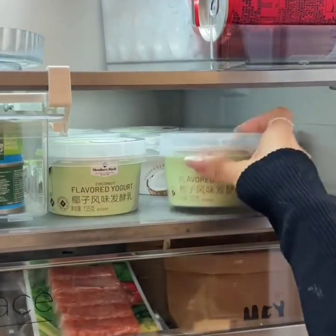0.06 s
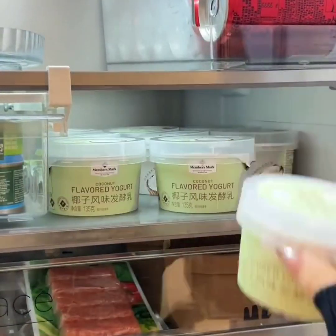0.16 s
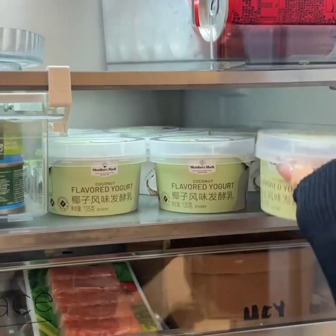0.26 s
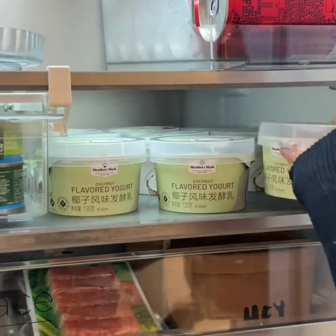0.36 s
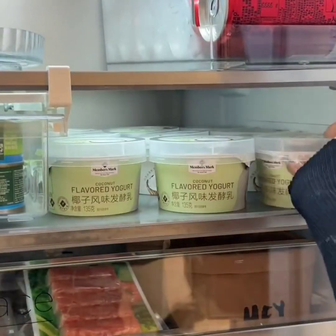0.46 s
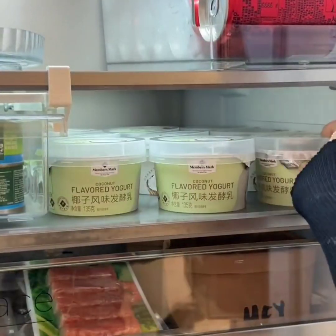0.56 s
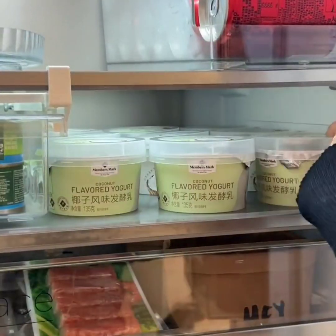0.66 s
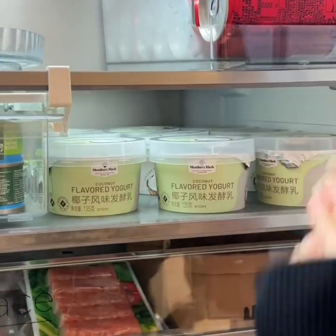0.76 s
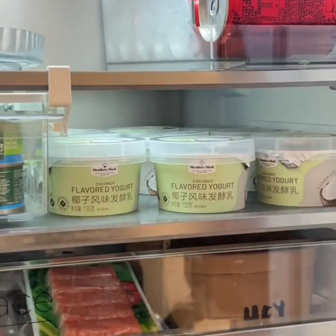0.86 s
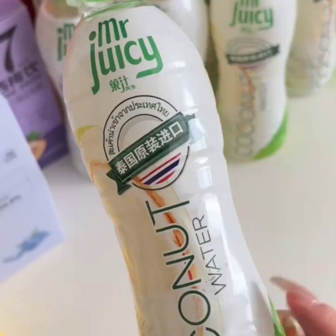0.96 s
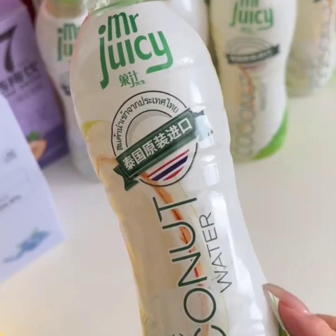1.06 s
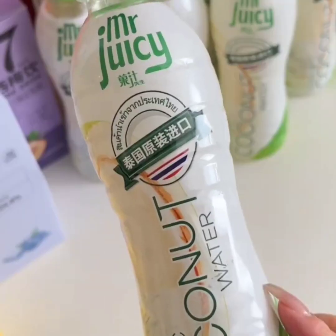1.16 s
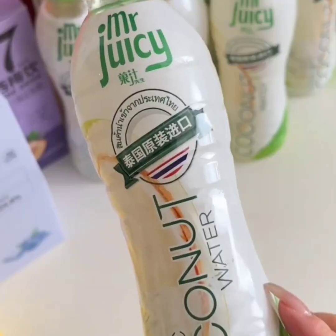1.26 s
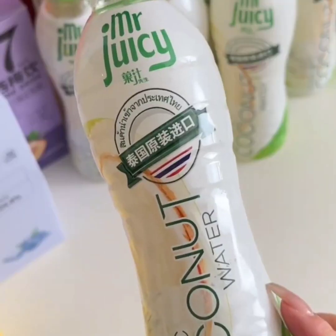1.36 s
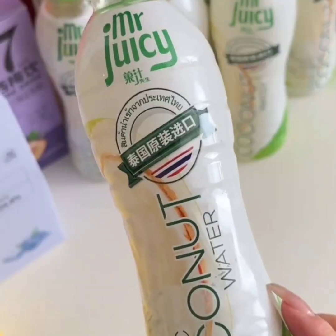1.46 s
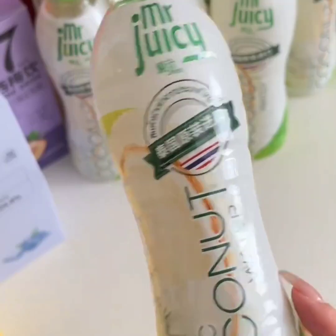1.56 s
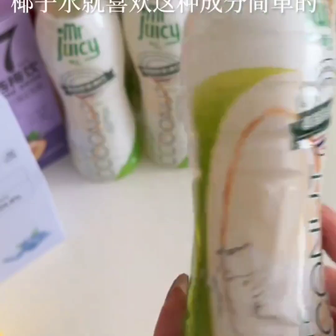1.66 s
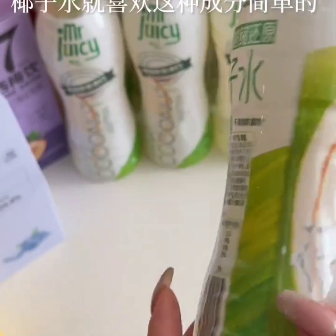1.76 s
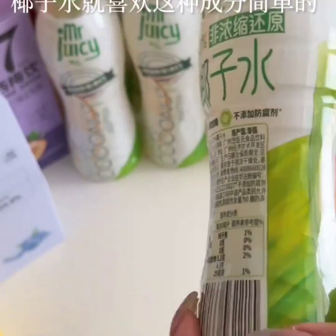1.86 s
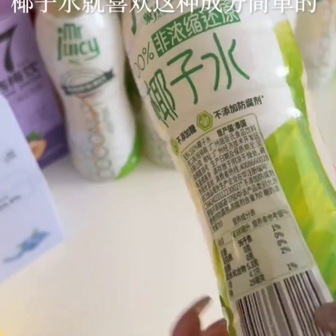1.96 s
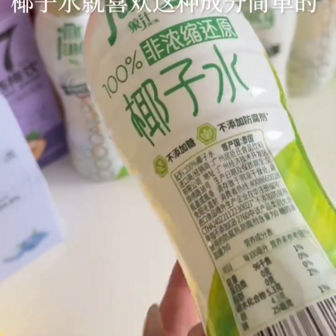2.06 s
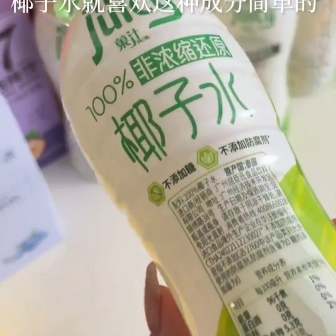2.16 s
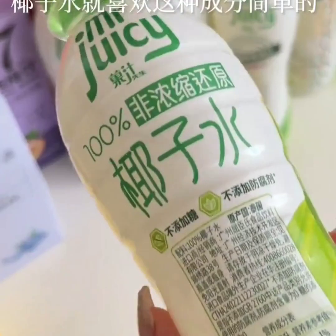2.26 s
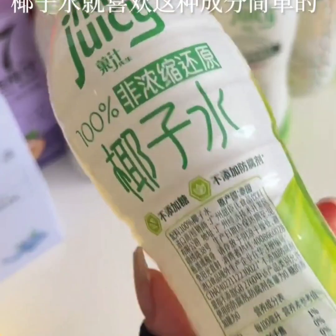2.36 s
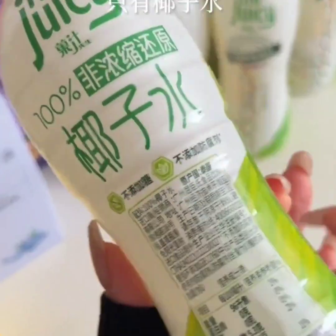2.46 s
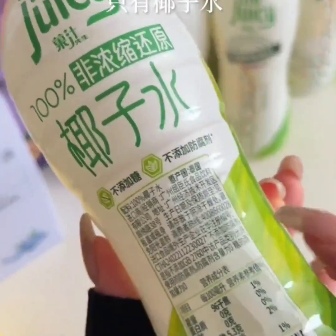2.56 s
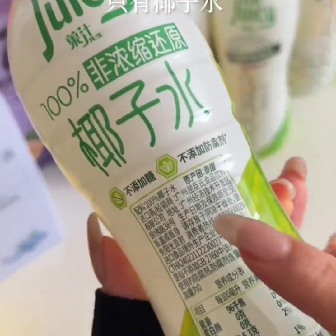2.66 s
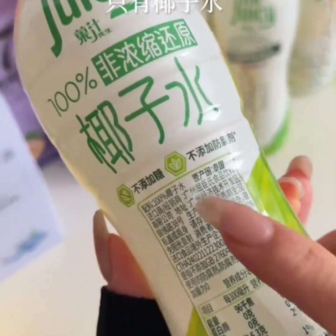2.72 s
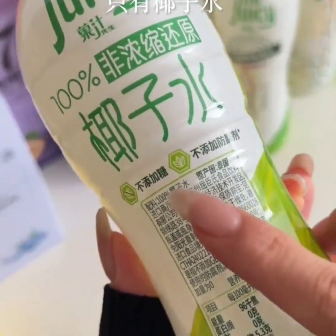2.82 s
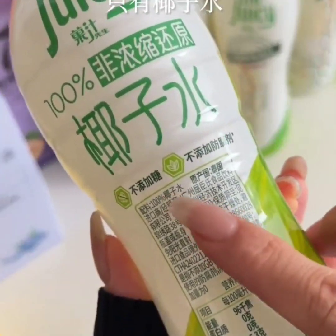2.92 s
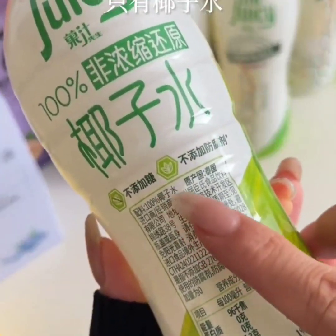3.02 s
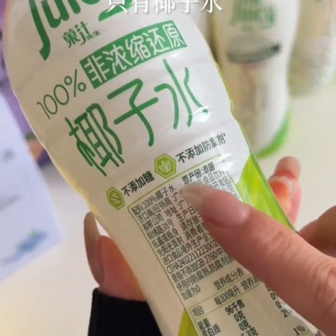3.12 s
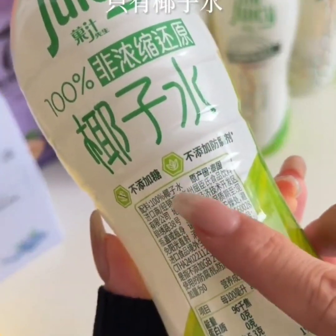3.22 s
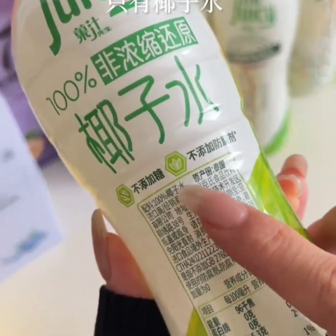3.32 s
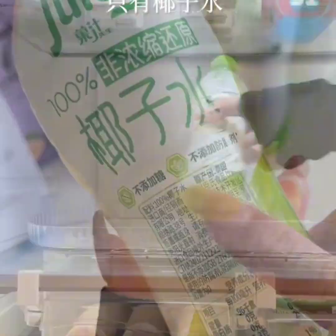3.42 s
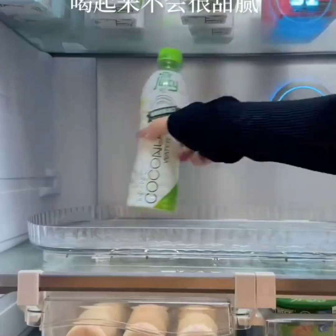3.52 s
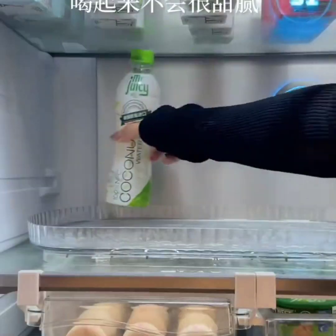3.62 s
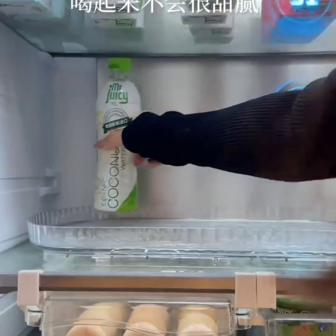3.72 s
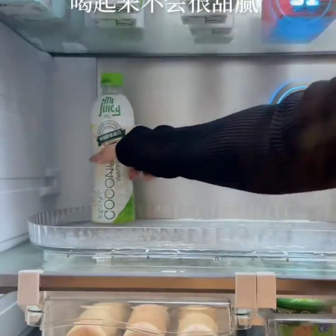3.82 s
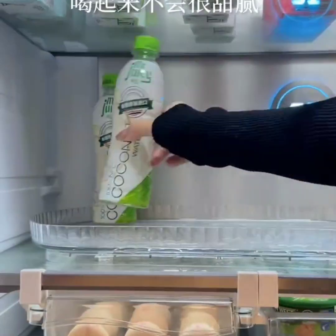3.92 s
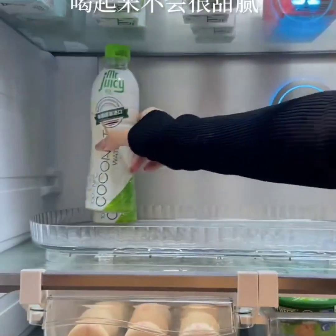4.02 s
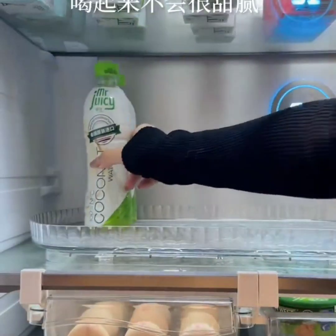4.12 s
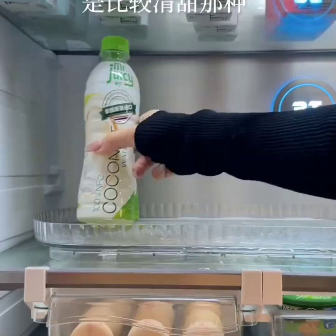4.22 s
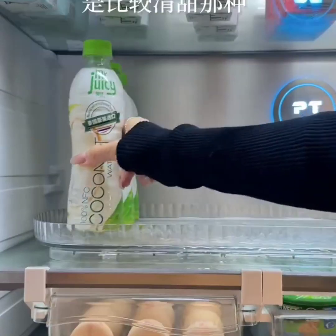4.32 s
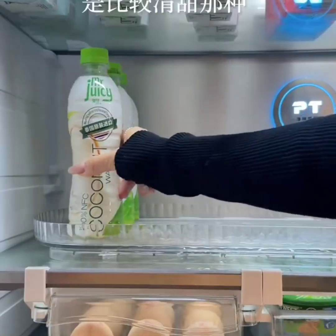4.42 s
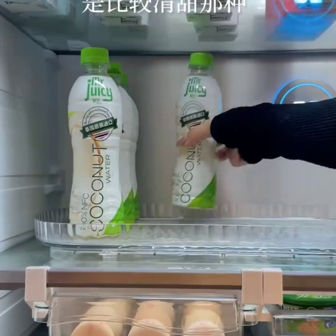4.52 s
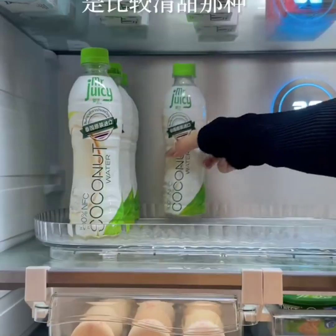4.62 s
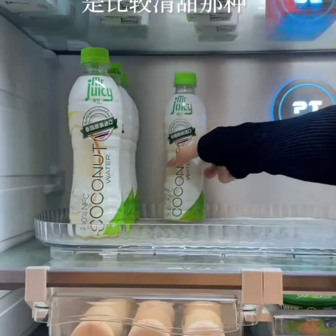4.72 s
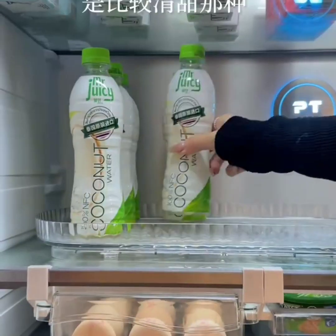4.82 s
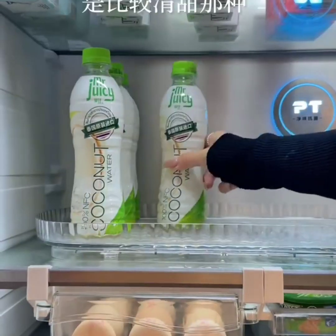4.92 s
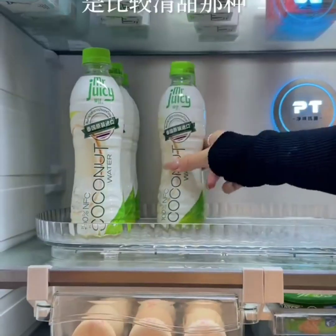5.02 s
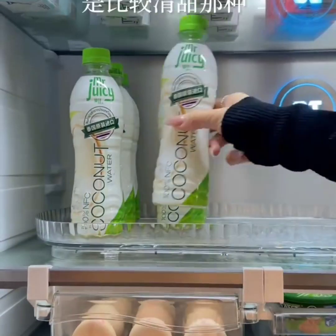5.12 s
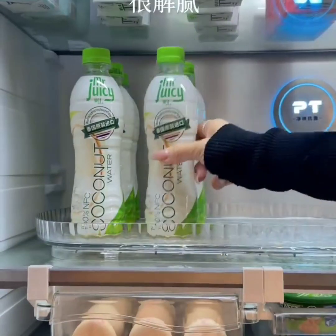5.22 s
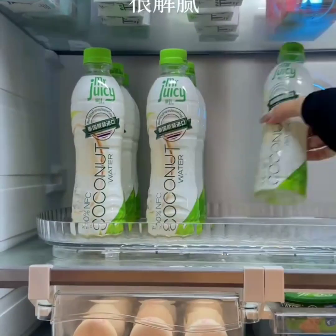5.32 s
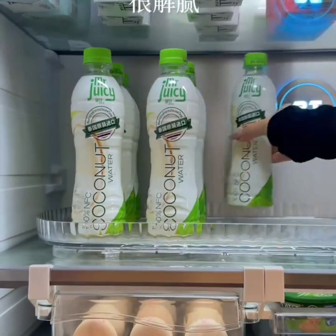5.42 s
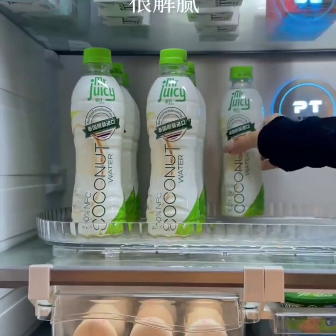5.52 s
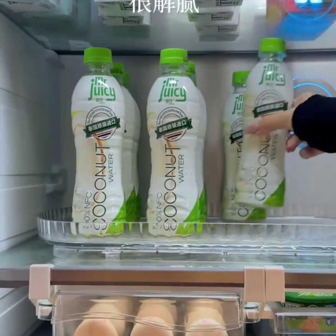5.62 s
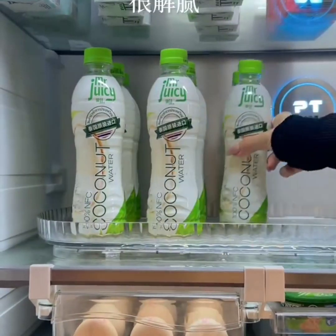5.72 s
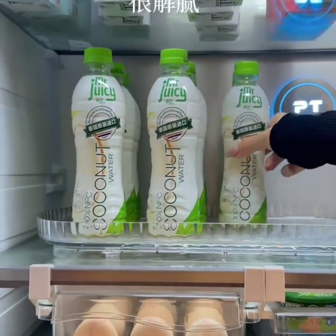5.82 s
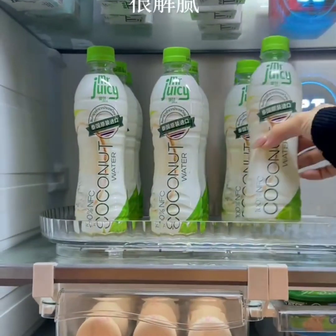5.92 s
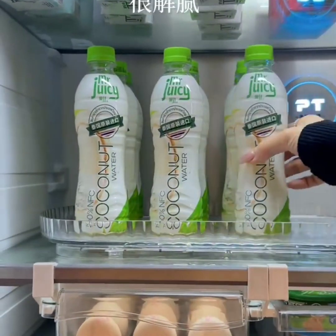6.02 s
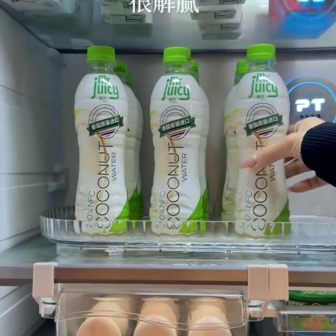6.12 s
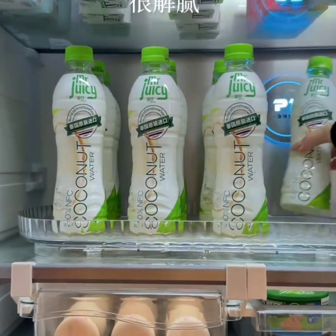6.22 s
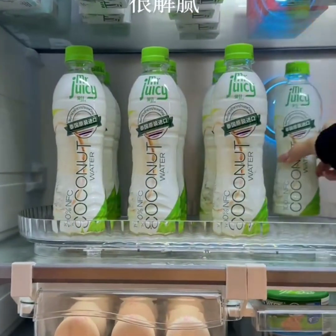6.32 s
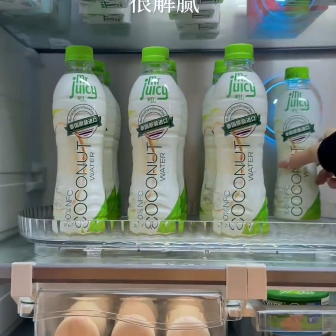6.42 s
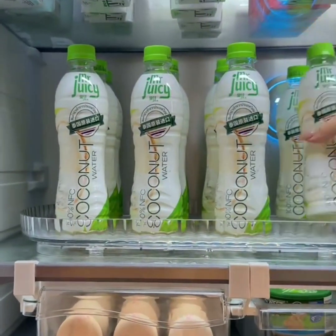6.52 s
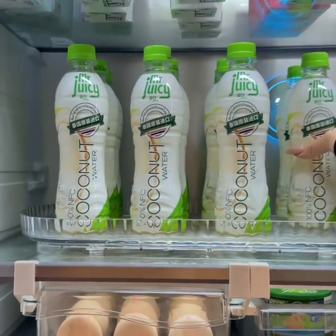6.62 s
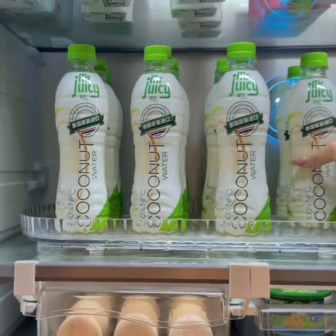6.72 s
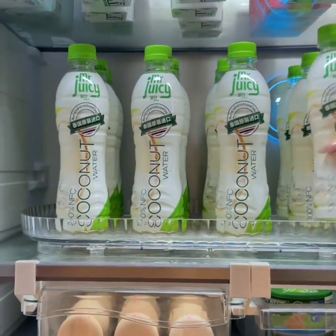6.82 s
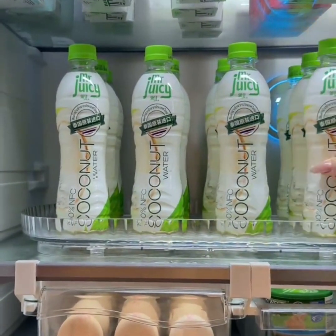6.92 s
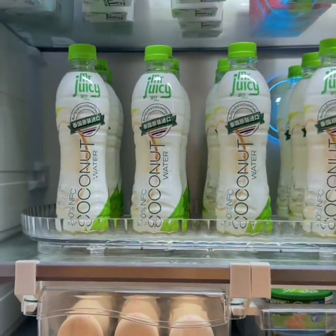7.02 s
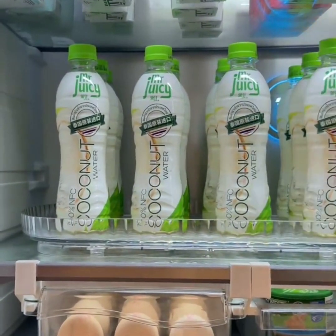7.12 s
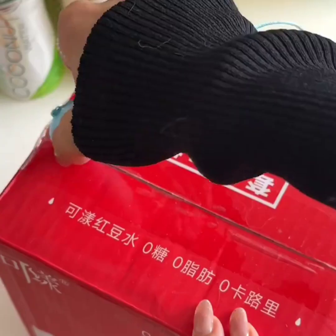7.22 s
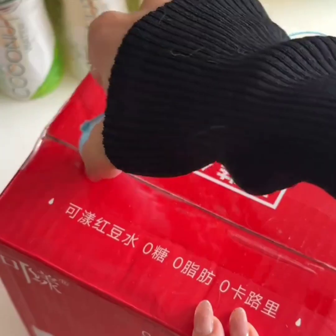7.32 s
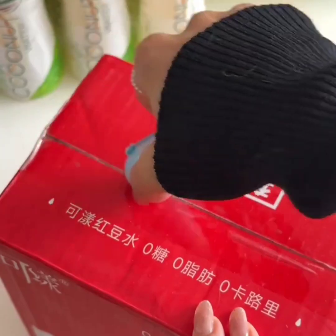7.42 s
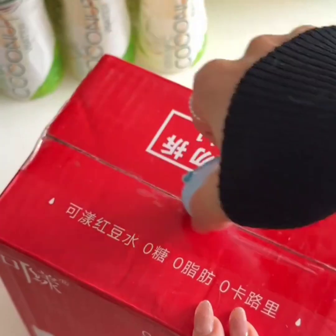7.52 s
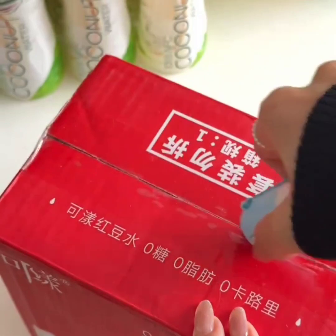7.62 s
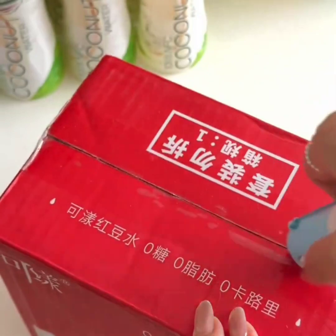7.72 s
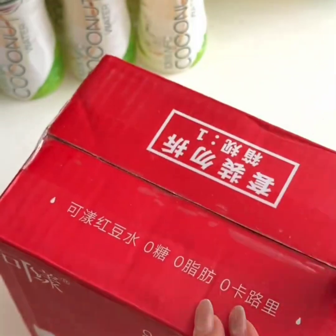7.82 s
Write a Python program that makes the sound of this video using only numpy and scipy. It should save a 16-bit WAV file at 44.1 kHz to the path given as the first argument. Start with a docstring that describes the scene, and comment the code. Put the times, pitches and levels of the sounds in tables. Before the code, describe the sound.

A closely miked fridge and tabletop, with little room sound and a faint low hum. First come a few hollow tub knocks, a short squeal on glass and sleeve rustle. A quiet passage follows, with nail ticks and soft rubbing on plastic. Full bottles land one after another on a tray with clacks, dull thuds and scraping pushes, before a blade punches and rips through box tape with growing noise.

```python
"""Putting groceries away

Close, dry stereo at a fridge and a table, in short takes joined by quick fades. Yoghurt tubs knock and skid on glass,
nails tick on a full bottle, bottles land on a hollow tray and are pushed, a blade stabs and slits a taped case.
Contacts are noise bursts rung through resonances; rubbing, tearing and the low hum are shaped, fluttering noise.
Squeaks and the tray's ring are sines."""
import sys
import numpy as np
from scipy import signal
from scipy.fft import rfft, irfft, next_fast_len
from scipy.io import wavfile
from scipy.ndimage import uniform_filter1d, map_coordinates

SR = 44100
rng = np.random.default_rng(int(sys.argv[2]) if len(sys.argv) > 2 else 0)


def transcribe(signal):
    """Save signal, clipped to [-1, 1], as a 16-bit WAV file at the path in sys.argv[1]."""
    frames = np.atleast_2d(signal).T
    limited = np.clip(frames, -1, 1)
    pcm = np.round(limited * 32767).astype(np.int16)
    wavfile.write(sys.argv[1], SR, pcm)


N = 347067


def amp(db):
    """Decibels to gain."""
    return 10 ** (np.asarray(db) / 20)


def unit(x):
    """x at rms 1."""
    return x / np.sqrt(np.mean(x ** 2) + 1e-20)


def clock():
    """The time of every sample, in seconds."""
    return np.arange(N) / SR


def wobble(rate):
    """A random curve of straight segments, rate knots a second."""
    knots = rng.standard_normal(int(N * rate / SR) + 4)
    return map_coordinates(knots, [clock() * rate], order=1)


def filtered(x, response):
    """x times a complex response of frequency."""
    n = x.shape[-1]
    padded = next_fast_len(n + 4096)
    hz = np.fft.rfftfreq(padded, 1 / SR)
    return irfft(rfft(x, padded) * response(hz), padded)[..., :n]


def colour(points, hz):
    """Gain of (frequency [Hz], level [dB]) points on a log frequency axis."""
    f, db = np.transpose(points)
    return amp(np.interp(np.log(hz + 1), np.log(f), db))


def resonance(modes, hz):
    """Resonant peaks of (frequency [Hz], width [Hz], level [dB]) on a flat response."""
    peaks = (amp(db) * 1j * hz * width / (centre ** 2 - hz ** 2 + 1j * hz * width)
             for centre, width, db in modes)
    return 1 + sum(peaks)


def stereo_noise(n, side_db):
    """White noise, mostly common to both channels; side_db sets the part that differs."""
    mid, side = rng.standard_normal((2, n))
    return np.array([mid + amp(side_db) * side, mid - amp(side_db) * side])


def friction(spectrum, modes, grain_db, grain_rate, side_db):
    """Noise of rms 1 that comes in slips of random size and passes through a body."""
    grain = amp(np.clip(grain_db, 0, 6) * wobble(grain_rate))
    slips = stereo_noise(N, side_db) * grain
    return unit(filtered(slips, lambda hz: colour(spectrum, hz) * resonance(modes, hz)))


def crackle(spectrum, per_second, spread_db):
    """Sparse tiny snaps of rms 1, in random sizes."""
    sizes = amp(spread_db * np.minimum(rng.exponential(size=N), 2))
    snaps = (rng.random(N) < per_second / SR) * sizes
    return unit(filtered(snaps * stereo_noise(N, side_db=-7.0), lambda hz: colour(spectrum, hz)))


def stroke(start, end, db, attack, release, sag_db_per_s=0):
    """Gain of one movement: attack, hold, release; the attack and release times span 60 dB."""
    t = clock()
    edges = np.maximum(start - t, 0) / attack + np.maximum(t - end, 0) / release
    sag_db = sag_db_per_s * np.clip(t - start, 0, abs(end - start))
    return amp(db - sag_db) * np.exp(-np.log(1000) * edges)


def strokes(rows, attack, release):
    """Gain of several movements of the same shape."""
    return sum(stroke(start, end, db, attack, release) for start, end, db in rows)


def voiced(rows, balance):
    """A harder contact is brighter: each band's level follows from strength and hardness."""
    return [(s, hz, *(db + offset + slope * hardness for offset, slope in balance))
            for s, hz, db, hardness in rows]


# thud, body, clack and crack bands: (low edge [Hz], high edge [Hz], time over which the level counts [s])
BANDS = [(62, 300, .011), (300, 1200, .005), (1200, 3400, .0034), (3400, 15500, .003)]


def blows(rows, modes, t60s, pushes, wall_db, wall_share, tail_db, lead_db, lead_t60, lead_length,
          snap_t60, dull_hz, thud_lag, side_db):
    """Contacts: a short swell, a snap and a tail that dies by band, coloured by the object's resonances."""
    before, size = SR // 10, SR // 2
    t = (np.arange(size) - before) / SR
    out = np.zeros((2, N + 2 * size))
    for s, wall_hz, *levels in rows:
        # no excitation is carried past the middle of the next fade
        take_end = min([fade for fade, _ in FADES if fade > s] + [N / SR])
        grit = stereo_noise(size, side_db) * (s + t < take_end)
        # the surfaces meet in many tiny, uneven contacts
        knots = t[::30]
        grit *= amp(2.5 * np.interp(t, knots, rng.standard_normal(len(knots))))
        # each touch weights the resonances anew, and the struck patch of wall adds its own pitch
        struck = [(hz, width, db + 2 * rng.standard_normal()) for hz, width, db in modes]
        struck.append((wall_hz, wall_share * wall_hz, wall_db))
        # contacts with three levels have no thud
        for db, t60, push, (lo, hi, span) in zip(levels, t60s, pushes, BANDS[-len(levels):]):
            # in the thud band, the contents may arrive a moment after the wall has touched
            u = t - thud_lag * (lo == BANDS[0][0])
            swell = amp(lead_db - 60 * np.abs(u) / lead_t60) * np.exp(-(u / lead_length) ** 4)
            decay = amp(-60 * np.abs(u) / snap_t60) + amp(tail_db - 60 * np.abs(u) / t60)
            force = grit * np.where(u < 0, swell, decay)
            force[:, np.abs(u).argmin()] += push  # the one-sided push of the touch itself
            ring = filtered(force, lambda hz: resonance(struck, hz) / (1 + 1j * hz / dull_hz))
            band = signal.butter(3, (lo, hi), "band", fs=SR, output="sos")
            ring = signal.sosfilt(band, ring)
            loudest = uniform_filter1d(ring.mean(0) ** 2, int(span * SR)).max()
            out[:, round(s * SR):][:, :size] += amp(db) * ring / np.sqrt(loudest)
    return out[:, before:before + N]


# hum spectra at the table and at the open fridge, and thin air noise: (frequency [Hz], relative level [dB])
ROOM_HUM = [(15, -51.5), (25, -20.5), (102, -7), (128, -9.5), (142, -2.5), (160, -0.5), (210, -9.5),
            (230, -13.5), (267, -12.5), (383, -21), (425, -12), (465, -27.5), (574, -33.5), (708, -32.5),
            (900, -33.5), (1170, -36), (1980, -120)]
FRIDGE_HUM = [(15, -34.5), (25, -18.5), (81, 0.5), (123, -0.5), (165, -3.5), (279, -13), (330, -15),
              (502, -27.5), (574, -25), (687, -38.5), (752, -31), (900, -41), (1170, -64), (1980, -120)]
AIR = [(300, 1), (700, 1), (1400, -1.5), (2500, -9), (5000, -12.5), (9000, -13), (15500, -20)]
# the stretch at the table: (start [s], end [s])
AT_TABLE = (0.84, 3.52)


def background():
    """Wavering low noise hums for the room at the table, for the open fridge elsewhere, under thin air noise."""
    at_fridge = (clock() < AT_TABLE[0]) | (clock() > AT_TABLE[1])
    room = friction(ROOM_HUM, [(157, 16, -7), (498, 16, -1.0)], grain_db=1.5, grain_rate=14, side_db=-3.5)
    fridge = friction(FRIDGE_HUM, [], grain_db=3, grain_rate=24, side_db=-2.5)
    air = friction(AIR, [], grain_db=.3, grain_rate=8, side_db=-6)
    hum = amp(-42.5) * ~at_fridge * room + amp(-40.5) * at_fridge * fridge
    return hum + amp(np.where(at_fridge, -62, -63)) * air


# brushes of fingers and sleeve over plastic: (time [s], length [s], level [dB])
BRUSHES = [(0.044, 0.039, -46), (0.133, .035, -49), (0.651, .055, -48), (0.871, 0.07, -51.5),
           (0.939, 0.061, -49), (1.042, .05, -48), (1.108, .043, -52.5), (2.941, 0.037, -52.5),
           (3.37, .07, -54.5), (3.479, .14, -53.5), (4.891, 0.057, -40), (5.386, 0.18, -51.5),
           (5.565, .064, -50.5), (6.863, .04, -38.5), (7.141, 0.044, -36)]
# the knitted sleeve rustles while the arm is in the fridge: (start [s], end [s], level [dB])
REACHES = [(.17, .24, -53), (.34, .85, -59), (3.55, 3.78, -64), (4.54, 4.59, -59), (4.95, 5.04, -56),
           (6.2, 6.85, -65.5)]
# spectrum of skin and sleeve: (frequency [Hz], relative level [dB])
BRUSH_COLOUR = [(300, 8), (1000, -3.5), (2500, -3.5), (5000, -6), (9000, 0.5), (12000, -5.5), (15500, -6.5)]


def brushing():
    """Skin and sleeve rub on plastic: soft noise for touches, reaches and fingers sliding off pushed bottles."""
    touches = sum(amp(db) * np.exp(-np.abs(2 * (clock() - s) / length) ** 3) for s, length, db in BRUSHES)
    # the fingers slide off over the last 35 ms of each push
    letting_go = sum(stroke(end - .035, end, db, attack=.22, release=.19) for _, end, _, db in PUSHES)
    sleeve = strokes(REACHES, attack=.15, release=.2) * amp(5 * wobble(14))
    rubbing = friction(BRUSH_COLOUR, [], grain_db=0, grain_rate=440, side_db=-8.5)
    return (touches + letting_go + sleeve) * rubbing


# yoghurt tubs on the shelf: (time [s], wall pitch [Hz], relative strength [dB], hardness [dB])
TUBS = [(.067, 1610, -13.5, 1), (.077, 1840, -11.5, -0.5), (.2425, 1914, -28.5, -1.5),
        (.2545, 2160, -14.5, -6.5), (.42, 1270, -21, 4), (.432, 1085, -10, -2.5), (.6654, 1400, -29, 0),
        (.6806, 1723, -39, 4)]
# per band, low to high: (level over the strength [dB], level gained per hardness [dB/dB])
TUB_BALANCE = [(-14, -1.27), (1.5, 0.5), (0.5, 2.52), (-8, 2.16)]
# tub resonances: (frequency [Hz], width [Hz], relative level [dB])
TUB_MODES = [(306, 54, -6), (464, 82, 21.5), (654, 150, 17.5), (850, 150, -0.5), (1400, 200, 9.5),
             (1940, 510, -1), (2400, 190, -3), (5490, 890, -0.5)]


def tub_knocks():
    """Light tubs clop on the glass: noise bursts ring the tub's resonances and the struck wall."""
    knocks = blows(voiced(TUBS, TUB_BALANCE), TUB_MODES, t60s=[0.17, 0.083, .09, 0.073],
                   pushes=[2, 23, 4.5, 11.0], wall_db=19.0, wall_share=0.18, tail_db=-7.5, lead_db=1.5,
                   lead_t60=0.062, lead_length=0.017, snap_t60=0.027, dull_hz=3000, thud_lag=0.0029,
                   side_db=-8.0)
    return amp(-1.5) * knocks


# dull nudges that shake the shelf: (time [s], half length [s], level [dB])
NUDGES = [(0.129, 0.011, -31.5), (.522, 0.029, -26.5), (4.908, 0.006, -29), (5.015, 0.0074, -33.5),
          (6.385, .022, -24), (6.769, 0.011, -33), (6.923, 0.014, -20)]
# spectrum of the trembling shelf: (frequency [Hz], relative level [dB])
SHELF = [(50, -21.5), (90, 3.5), (125, 2), (170, -20.5), (280, -35.5), (600, -52)]


def nudges():
    """A soft push makes only the shelf's low range tremble, as a short swell of low noise."""
    shake = sum(amp(db) * np.exp(-((clock() - s) / half) ** 2) for s, half, db in NUDGES)
    return shake * friction(SHELF, [], grain_db=0, grain_rate=100, side_db=-14)


# a tub skids on the glass, then creeps to rest: (start [s], end [s], level [dB])
SKIDS = [(.478, .486, -17.5), (.5, .543, -37.5)]
# spectra of the droning body and the squealing base: (frequency [Hz], relative level [dB])
SKID_BODY = [(100, -18.5), (200, -30), (270, 2.5), (340, -9), (430, -8), (510, -1.5), (620, -10),
             (900, -14), (1500, -21.5), (3000, -46)]
SKID_SQUEAL = [(710, -61.5), (1200, -14.5), (1690, -8.5), (1860, -19), (2510, -11.5), (3180, -17),
               (3900, -13), (4380, -20.5), (5370, -14), (6580, -10.5), (8150, -19), (10100, -13),
               (15500, -30.5)]
# resonances of the squeal: (frequency [Hz], width [Hz], relative level [dB])
SQUEAL_MODES = [(5220, 170, 9.5), (6330, 93, 5.5)]


def tub_skid():
    """A tub rubs over the glass: its body drones just before its base squeals, both as grainy noise."""
    squeal = strokes(SKIDS, attack=.076, release=.054)
    body = amp(-2) * np.interp(clock() + .008, clock(), squeal)  # 8 ms ahead of the squeal
    drone = friction(SKID_BODY, [], grain_db=1, grain_rate=900, side_db=-12)
    squealing = friction(SKID_SQUEAL, SQUEAL_MODES, grain_db=1.5, grain_rate=1500, side_db=-5)
    return body * drone + squeal * squealing


# fingernails on plastic: (time [s], wall pitch [Hz], relative strength [dB], hardness [dB])
NAILS = [(1.0392, 2150, -25.5, 0), (1.112, 1010, -46.5, -12.5), (1.9389, 3740, -45.5, 6),
         (1.9784, 3880, -34.5, -8.5), (2.1745, 3620, -44.5, 6.5), (3.3438, 2140, -36, 2.5),
         (3.3774, 3690, -49.5, 6.5), (3.4198, 2700, -40.5, 0.5), (3.4702, 2400, -35.5, 2.5),
         (3.4998, 2794, -40.5, 1), (4.9082, 3870, -31.5, 11.5), (6.9854, 3790, -50, 15.5)]
# per band, low to high, without the thud: (level over the strength [dB], level gained per hardness [dB/dB])
NAIL_BALANCE = [(-10, -0.81), (-0.5, 0.3), (1, 0.94)]
# resonances under the nails: (frequency [Hz], width [Hz], relative level [dB])
NAIL_MODES = [(2280, 450, 5.3), (3785, 170, 1.7), (6080, 1000, 5.9), (10200, 7200, 11)]


def nails():
    """Long nails tick on the bottle wall: short, bright contacts with no thud."""
    ticks = blows(voiced(NAILS, NAIL_BALANCE), NAIL_MODES, t60s=[.07, .07, .06], pushes=[8, 7, 5],
                  wall_db=7.5, wall_share=0.13, tail_db=-12.5, lead_db=-13.5, lead_t60=0.12,
                  lead_length=0.018, snap_t60=.014, dull_hz=9000, thud_lag=0, side_db=-9.0)
    return amp(-0.5) * ticks


# the label slides through the fingers as the bottle is turned: (start [s], end [s], level [dB])
TURNS = [(1.65, 1.95, -47.5), (2.19, 2.44, -47), (2.54, 2.56, -50.5), (2.66, 2.74, -59.5)]
# the full bottle rumbles as the grip changes: (start [s], end [s], level [dB])
REGRIP = [(1.87, 1.99, -35.5)]
# spectrum of the sliding label: (frequency [Hz], relative level [dB])
LABEL = [(530, -33), (900, -9), (1040, -6.5), (1400, -10), (1500, -10), (2310, -5), (5000, -7), (8440, 0),
         (15500, -1.5)]


def bottle_turning():
    """The label rubs through the fingers as bright noise; the changing grip rumbles in the room hum's colour."""
    sliding = strokes(TURNS, attack=.22, release=.22) * amp(1.2 * wobble(27))
    label = sliding * friction(LABEL, [], grain_db=2.5, grain_rate=300, side_db=-8.5)
    grip = strokes(REGRIP, attack=.22, release=.22)
    return label + grip * friction(ROOM_HUM, [], grain_db=4, grain_rate=30, side_db=-20)


# brief squeaks of plastic and of the blade in the board:
# (time [s], half length [s], mean pitch [Hz], relative level [dB])
SQUEAKS = [(1.979, 0.0061, 3900, -42.5), (3.275, 0.024, 1890, -58.5), (3.502, 0.0065, 2810, -39.5),
           (3.785, 0.0025, 1090, -42.5), (5.112, 0.019, 2020, -55), (7.428, 0.014, 1557, -40)]


def squeaks():
    """Surfaces stick and slip for a moment: sines of unsteady pitch and rough level chirp."""
    warped = np.cumsum(1 + .07 * wobble(1200)) / SR
    rough = unit(amp(4 * wobble(700)))
    chirps = sum(amp(db + 1) * np.exp(-((clock() - s) / half) ** 2) * np.sin(2 * np.pi * hz * warped)
                 for s, half, hz, db in SQUEAKS)
    return rough * chirps


# full bottles meeting the tray and each other:
# (time [s], wall pitch [Hz], relative strength [dB], hardness [dB])
BOTTLES = [(3.8415, 2730, -18, 5), (3.8635, 2473, -18.5, 6), (4.1421, 2870, -21.5, 3),
           (4.1604, 2986, -19, 3), (4.1834, 2554, -26, 4.5), (4.3816, 3000, -17.5, 2),
           (4.4104, 2940, -22, 1), (4.6751, 2380, -26, 2.5), (4.7201, 1610, -37, -3.5),
           (4.7673, 970, -37.5, -9.5), (4.9082, 2673, -21.5, 3), (5.2514, 1335, -17.5, 3.5),
           (5.2856, 1560, -29, -0.5), (5.5705, 2400, -24, 1), (5.762, 1524, -19, 2),
           (6.0103, 1840, -23, -2), (6.356, 2022, -22, 1), (6.3615, 1576, -19, -2.5),
           (6.6053, 1890, -27, -4.5), (6.6405, 1720, -33.5, -5.5), (6.768, 930, -44.5, -9.5),
           (6.8665, 1300, -27, -6.5), (6.8875, 1510, -21, -1.5)]
# per band, low to high: (level over the strength [dB], level gained per hardness [dB/dB])
BOTTLE_BALANCE = [(-2, -.4), (0, 0), (-1, 0.75), (-10.5, 1.4)]
# bottle resonances: (frequency [Hz], width [Hz], relative level [dB])
BOTTLE_MODES = [(132.5, 48, 6.5), (181.6, 6.8, 6.5), (442, 28, 7), (616, 88, 2.5), (824, 25, 2),
                (1414, 39, -2), (1943, 300, 7.5), (2178, 81, 8), (2380, 110, 7.5), (2865, 19, 0),
                (3950, 11, -9.5), (6000, 1200, -7.5), (7000, 340, 0.5)]


def bottle_knocks():
    """Full bottles land on the tray: the wall clacks, and the heavy contents thud a moment later."""
    knocks = blows(voiced(BOTTLES, BOTTLE_BALANCE), BOTTLE_MODES, t60s=[0.19, 0.14, 0.12, 0.12],
                   pushes=[20, 20, 6.3, 2], wall_db=9.5, wall_share=.09, tail_db=-2.0, lead_db=-1.0,
                   lead_t60=0.074, lead_length=.026, snap_t60=0.027, dull_hz=5140, thud_lag=0.0066,
                   side_db=-9)
    return amp(2.5) * knocks


# a bottle is pushed along the tray, then let go:
# (start [s], end [s], initial push level [dB], level of fingers sliding off [dB])
PUSHES = [(4.183, 4.22, -23.5, -59), (4.409, 4.502, -23.5, -56), (4.673, 4.778, -23, -47),
          (4.925, 5.051, -20, -62), (5.272, 5.316, -19.5, -51), (5.783, 5.871, -29.5, -70),
          (6.064, 6.138, -32.5, -50), (6.37, 6.461, -33, -50.5), (6.635, 6.732, -34.5, -50.5),
          (6.933, 6.983, -29, -48.5)]
# spectrum of the rubbing: (frequency [Hz], relative level [dB])
PUSH_COLOUR = [(40, -30), (100, 13), (700, -4), (1300, -11.5), (2800, -15), (4000, -40.5), (15000, -29.5)]
# tray resonances: (frequency [Hz], width [Hz], relative level [dB])
TRAY_MODES = [(129, 41, 1.8), (196, 28, 10), (343, 130, 15), (574.6, 13, 24.5), (681, 15, 18), (813, 20, 4),
              (930, 70, 6.2)]


def bottle_pushes():
    """Bottles judder along the tray: grainy noise through its resonances, sagging as the bottle slows."""
    effort = sum(stroke(start, end, db, attack=.014, release=.035, sag_db_per_s=115)
                 for start, end, db, _ in PUSHES)
    return effort * friction(PUSH_COLOUR, TRAY_MODES, grain_db=2, grain_rate=300, side_db=-6)


# a standing bottle rocks and taps the hollow tray: (time [s], relative level [dB])
ROCKS = [(4.718, -24.5), (4.765, -24.5), (4.943, -26.5), (5.284, -26.5), (5.853, -36.5), (6.077, -33),
         (6.098, -35), (6.668, -37.5), (6.96, -42)]
# ringing of the tray floor: (frequency [Hz], mean relative level [dB], 60 dB decay time [s])
TRAY_RING = [(577, -29, 0.012), (664, 6, 0.047), (750, -22.5, 0.017), (864, -21, 0.02)]


def rocking():
    """Each tap of a bottle's rim rings the tray floor: decaying sines at slightly new strengths."""
    out, t = np.zeros(N + SR), np.arange(SR // 5) / SR
    chances = rng.standard_normal((len(ROCKS), len(TRAY_RING)))
    for (s, db), chance in zip(ROCKS, chances):
        ring = sum(amp(level + 1.4 * c - 60 * t / t60) * np.sin(2 * np.pi * hz * t)
                   for (hz, level, t60), c in zip(TRAY_RING, chance))
        out[round(s * SR):][:len(t)] += amp(db) * ring
    return out[:N]


# spectra of the cut cardboard and the torn tape: (frequency [Hz], relative level [dB])
CARDBOARD = [(88, -32), (150, 2.5), (280, -10), (428, -6.5), (588, -13), (898, -14), (1140, -12),
             (1400, -22), (1520, -18), (2500, -16), (3250, -56), (5500, -120)]
TAPE = [(880, -50), (1500, -14), (2540, -5.5), (3340, -5), (4180, -9), (6750, -8), (8130, -6.5),
        (13000, -9), (14600, -5), (15500, -17)]


def slitting():
    """The blade tears along the tape while the cardboard drones beneath, both rising in level to the end."""
    run_s = clock() - 7.107  # time since the slit began
    drag = (run_s > 0) * amp(1.5 * wobble(45))  # the blade catches and runs free
    board = amp(-48 + 12.5 * run_s) * amp(1.3 * wobble(30))  # the board gives unevenly under it
    tape = amp(-48.5 + 8 * run_s)
    drone = friction(CARDBOARD, [(451, 53, 1.6), (1300, 160, 0.087)], grain_db=2.5, grain_rate=450,
                     side_db=-8.5)
    tearing = friction(TAPE, [], grain_db=3, grain_rate=1200, side_db=-8)
    # single fibres of board and tape give way with tiny snaps
    drone = drone + amp(-5) * crackle(CARDBOARD, per_second=90, spread_db=3)
    tearing = tearing + amp(-6) * crackle(TAPE, per_second=260, spread_db=3)
    return drag * (board * drone + tape * tearing)


# the blade punching in and catching on the case:
# (time [s], wall pitch [Hz], relative strength [dB], hardness [dB])
STABS = [(7.2079, 1080, -17, 1), (7.212, 1140, -33, 3), (7.3381, 1260, -40.5, 9), (7.3886, 3400, -28, -3.5),
         (7.4989, 2880, -37, -0.5), (7.5285, 2200, -33.5, -3.5), (7.644, 450, -33.5, -8),
         (7.7001, 1130, -31, -7), (7.783, 600, -28.5, -9.5), (7.8157, 1300, -12.5, -12.5)]
# per band, low to high: (level over the strength [dB], level gained per hardness [dB/dB])
CASE_BALANCE = [(-10.5, 0.2), (-1.5, 0), (-2.5, 0.5), (-1.5, 1.5)]
# case resonances: (frequency [Hz], width [Hz], relative level [dB])
CASE_MODES = [(320, 29, 17), (460, 52, 38), (596, 48, 2.5), (1440, 330, 2.7), (2810, 68, 3),
              (8200, 900, 8.2)]


def stabs():
    """The blade pops the taut tape and catches on the case, ringing the cardboard box."""
    pops = blows(voiced(STABS, CASE_BALANCE), CASE_MODES, t60s=[.09, .05, 0.13, .2],
                 pushes=[8, 15, 7, 3.6], wall_db=11, wall_share=0.077, tail_db=-8, lead_db=0,
                 lead_t60=0.034, lead_length=0.0077, snap_t60=.028, dull_hz=7020, thud_lag=0,
                 side_db=-11.5)
    return amp(-2.5) * pops


# quick fades between takes: (time [s], depth [dB])
FADES = [(0.162, 13), (.915, 18), (3.932, 11), (4.24, 14), (4.531, 16.5), (4.794, 20), (5.083, 20.5),
         (5.343, 16), (5.626, 13), (5.89, 25), (6.174, 21), (6.477, 17.5), (6.735, 19), (7.187, 30.5)]
# stereo width: (frequency [Hz], gain of the left-right difference [dB])
WIDTH = [(60, -24), (120, -19), (250, -4.5), (600, 3), (1300, 6), (2500, -15), (5000, 4.5), (15000, 0.5)]


def scene():
    """All takes in a row, the level dipping at each join; the bass is nearly the same in both channels."""
    fade_half_s = .014
    dips_db = sum(depth_db * np.exp(-np.abs((clock() - s) / fade_half_s) ** 3) for s, depth_db in FADES)
    at_fridge_shelf = tub_knocks() + nudges() + tub_skid()
    by_hand = brushing() + nails() + bottle_turning() + squeaks()
    on_tray = bottle_knocks() + bottle_pushes() + rocking()
    on_case = slitting() + stabs()
    left, right = (background() + at_fridge_shelf + by_hand + on_tray + on_case) * amp(-dips_db)
    mid = (left + right) / 2
    side = filtered((left - right) / 2, lambda hz: colour(WIDTH, hz))
    return np.array([mid + side, mid - side])


def record(dry):
    """The microphone signal's peaks are rounded off, and nothing is kept from 15.8 kHz up."""
    rounded = dry / (1 + np.abs(dry / .85) ** 6) ** (1 / 6)
    return filtered(rounded, lambda hz: hz < 15800)


dry = scene()
out = record(dry)
transcribe(out)
```